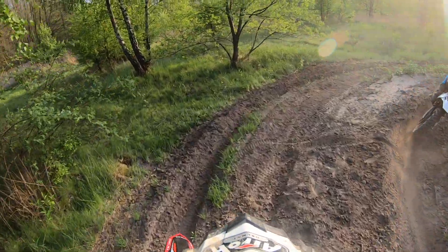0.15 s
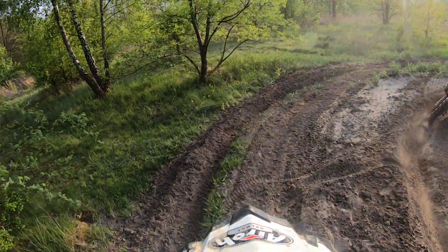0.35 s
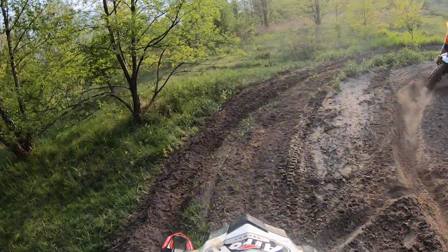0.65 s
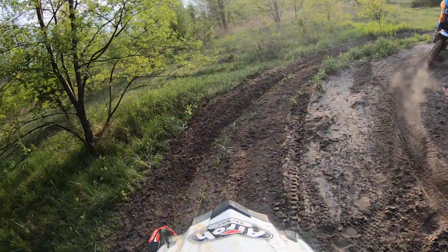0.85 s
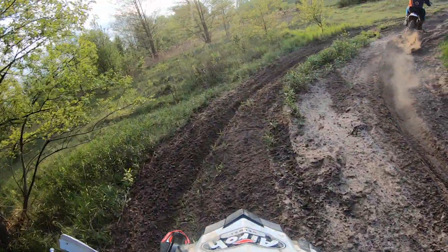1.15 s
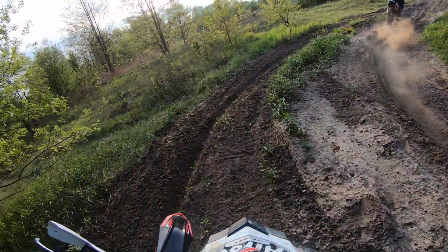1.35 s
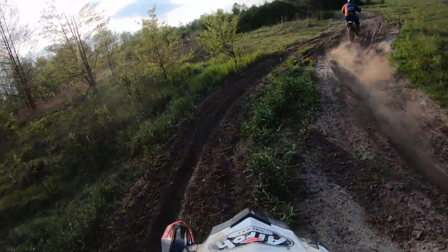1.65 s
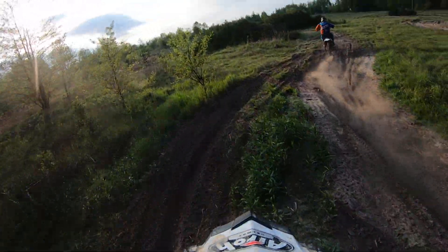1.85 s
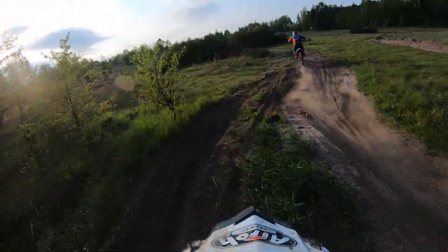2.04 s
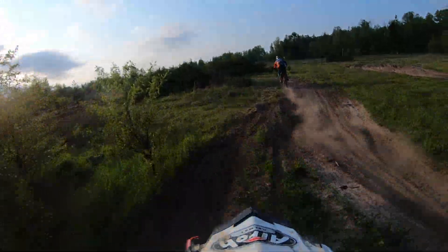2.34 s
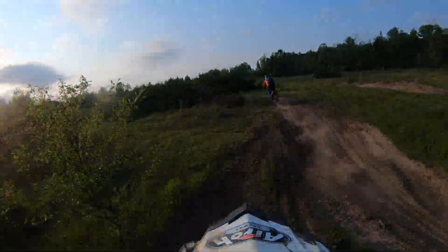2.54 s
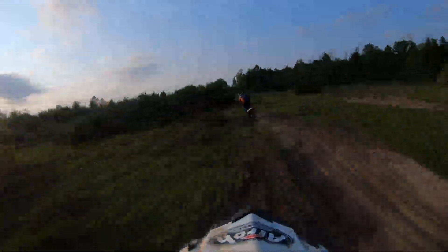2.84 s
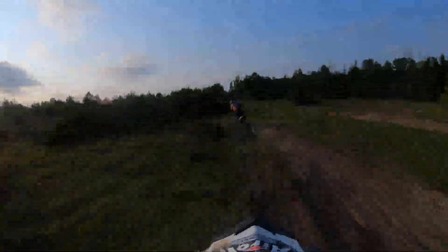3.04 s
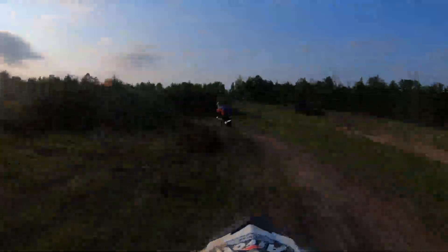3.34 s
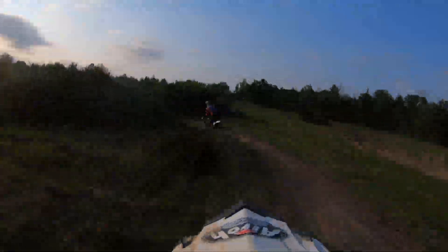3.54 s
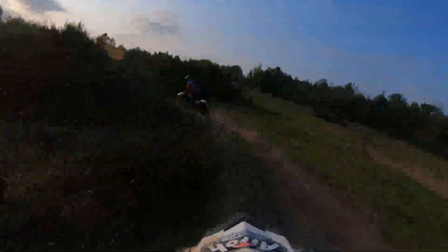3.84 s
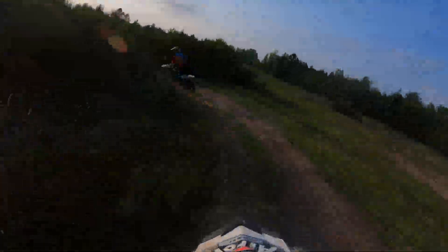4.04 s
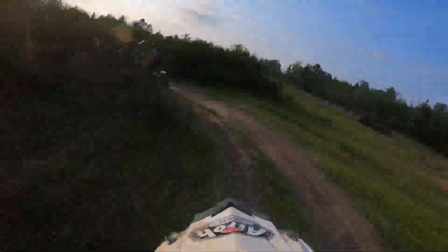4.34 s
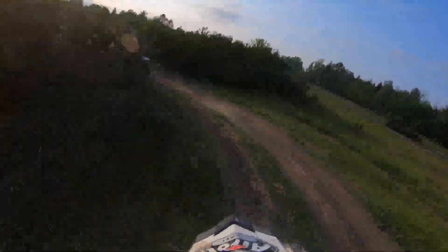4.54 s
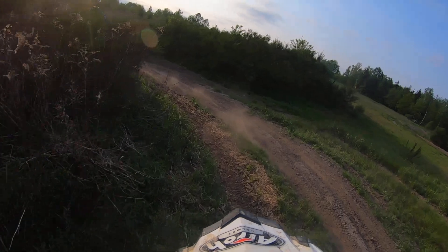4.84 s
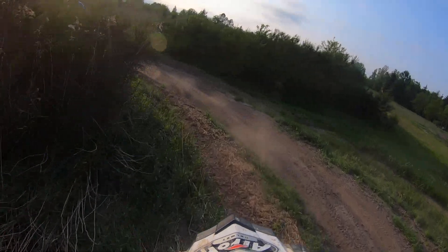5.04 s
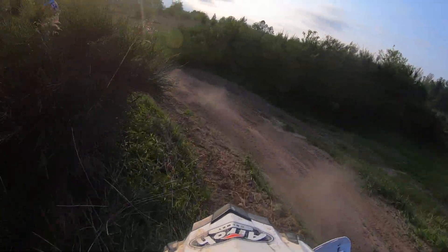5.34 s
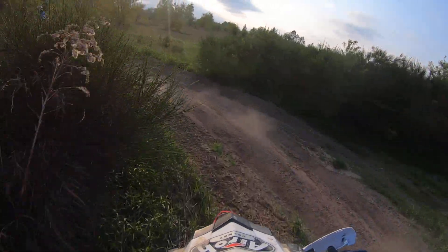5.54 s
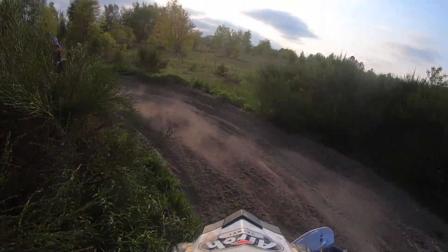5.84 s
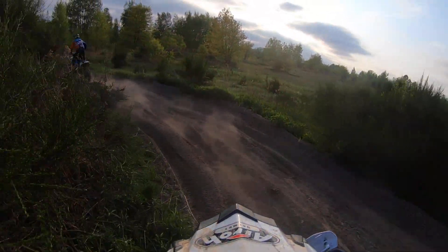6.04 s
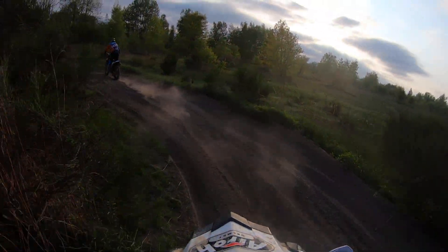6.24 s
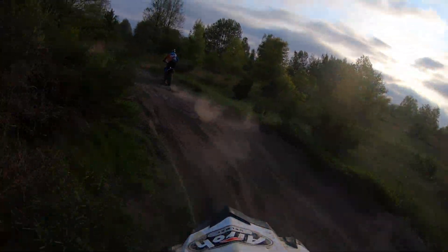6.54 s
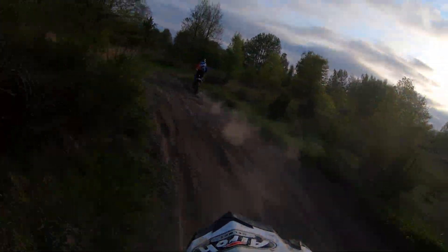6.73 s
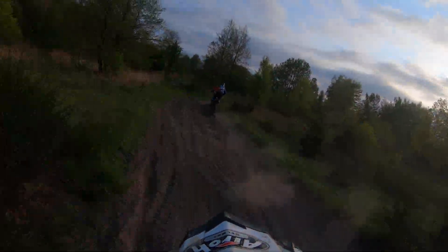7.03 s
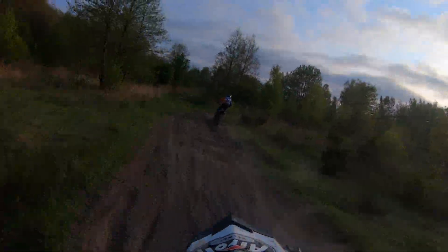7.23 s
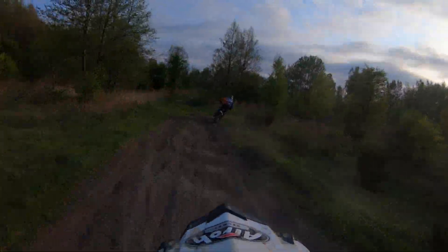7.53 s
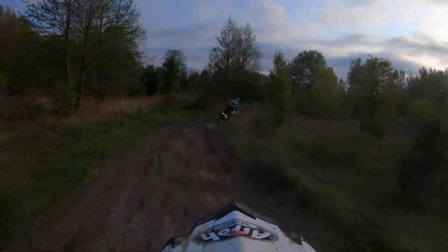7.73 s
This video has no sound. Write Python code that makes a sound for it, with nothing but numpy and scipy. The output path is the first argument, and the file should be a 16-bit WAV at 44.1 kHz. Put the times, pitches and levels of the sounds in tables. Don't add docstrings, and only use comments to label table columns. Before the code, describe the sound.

Heard from the rider's helmet, a dirt bike engine surges, shuts off, rattles through a shower of knocks, then pulls hard again.

```python
import sys
import numpy as np
from scipy import signal
from scipy.io import wavfile
from scipy.ndimage import uniform_filter1d

SR = 44100
rng = np.random.default_rng(int(sys.argv[2]) if len(sys.argv) > 2 else 0)


def file_out(sig):
    cols = np.atleast_2d(sig).T
    lim = np.clip(cols, -1, 1)
    pcm = np.round(lim * 32767).astype(np.int16)
    wavfile.write(sys.argv[1], SR, pcm)


def volts(x):
    e = np.asarray(x, float) / 20
    return 10 ** e


N = 347508


def rms_one(x):
    return x / np.sqrt(np.mean(x ** 2) + 1e-20)


def evened(x, window_s):
    return x / np.sqrt(uniform_filter1d(x ** 2, int(window_s * SR)) + 1e-12)


def in_time(rows):
    s, *columns = np.transpose(rows)
    return [np.interp(np.arange(N) / SR, s, c) for c in columns]


def held(rows, rise_db_per_s, fall_db_per_s):
    t = np.arange(N) / SR
    levels = []
    for start, end, first_db, last_db in rows:
        hold = np.interp(t, [start, end], [first_db, last_db])
        before = rise_db_per_s * np.maximum(start - t, 0)
        after = fall_db_per_s * np.maximum(t - end, 0)
        levels.append(hold - before - after)
    return np.array(levels)


def loudest(rows, rise_db_per_s, fall_db_per_s):
    return held(rows, rise_db_per_s, fall_db_per_s).max(axis=0)


def drift(rate_hz):
    r = np.exp(-80 * np.pi * rate_hz / SR)
    white = rng.standard_normal(N // 40 + 2002)
    slow = signal.lfilter([1], [1, -2 * r, r * r], white)[2000:]
    return np.interp(np.arange(N) / 40, np.arange(len(slow)), rms_one(slow - slow.mean()))


def resonate(x, hz, width_hz):
    r = np.exp(-np.pi * width_hz / SR)
    zeros = np.array([1, 0, -1]) * (1 - r * r) / 2
    return signal.lfilter(zeros, [1, -2 * r * np.cos(2 * np.pi * hz / SR), r * r], x)


def body(x, modes):
    return sum((-1) ** k * volts(db) * resonate(x, hz, width) for k, (hz, width, db) in enumerate(modes))


def band(x, low_hz, high_hz, order=2):
    return signal.sosfilt(signal.butter(order, [low_hz, high_hz], "band", fs=SR, output="sos"), x)


def decay(clicks, s):
    return signal.lfilter([1], [1, -np.exp(-1 / (s * SR))], clicks + 1e-18)


def puff(clicks, swell_s, die_s):
    return rng.standard_normal(N) * decay(decay(clicks, swell_s), die_s) / (swell_s * SR)


def struck(events):
    clicks = np.zeros(N)
    for s, peak_db in events:
        clicks[round(s * SR)] = volts(peak_db)
    return clicks


def coloured_noise(spectrum, patchy_db, rate_hz):
    hz, level_db = np.transpose(spectrum)
    edges = hz[0] * 2 ** np.arange(0, np.log2(hz[-1] / hz[0]), 1 / 3)
    white = rng.standard_normal((2, N))
    together = drift(rate_hz)
    flicker = [volts(patchy_db * (together + 0.32 * drift(rate_hz))) for _ in range(3)]
    out = 0
    for k, (low, high) in enumerate(zip(edges, edges[1:])):
        centre_db = np.interp(np.log(low * high) / 2, np.log(hz), level_db)
        out = out + volts(centre_db) * flicker[k % 3] * band(white[k % 2], low, high)
    return rms_one(out)


def firings(count, rough, jitter, spread_db):
    at = np.flatnonzero(np.diff(np.floor(count))) + 1
    luck = rng.standard_normal((600, 2))[:len(at)]
    period = 1 / np.gradient(count)[at]
    where = np.clip(at + jitter * rough[at] * period * luck[:, 0], 0, N - 1).astype(int)
    clicks = np.zeros(N)
    clicks[where] = volts(spread_db * rough[at] * luck[:, 1])
    return clicks


def own_engine():
    per_s = revs()
    boom_db, rough, pipe_hz, shoulder_db, lower_db, upper_db = throttle(per_s)
    load_db = boom_db + 10
    count = np.cumsum(per_s) / SR
    clicks = firings(count, rough, jitter=.09, spread_db=4.5)
    gas = rms_one(rng.standard_normal(N) * decay(clicks, .012))
    drive = rms_one(clicks) + (.08 + 1.2 * rough) * gas
    ragged = np.clip(1.5 * rough, 0, 1)
    steady = np.sqrt(1 - ragged ** 2)

    wobbly_count = count + 0.042 * rough * drift(27.0)
    clean_boom = tuned_orders(wobbly_count, per_s, pipe_hz, shoulder_db)
    boom = evened(steady * clean_boom + ragged * airbox(drive), 0.052)
    throb = crankcase(drive, count, per_s, ragged, steady)
    lower = lower_pipe(drive, count, per_s, ragged, steady)
    upper = upper_pipe(drive, gas, count, per_s, ragged, steady)

    pipes_follow, flutter_db = 0.37, 1.5
    lower_db = lower_db + pipes_follow * load_db + flutter_db * drift(6.9)
    upper_db = upper_db + 4.0 + pipes_follow * load_db + flutter_db * drift(7.9)
    throb_db = -25 + 0.045 * load_db + 0.41 * (per_s - 45)
    pipes = volts(lower_db) * lower + volts(upper_db) * upper + whistle(drive, gas)
    return volts(boom_db) * boom + volts(throb_db) * throb + pipes


# (t/s, firing rate/Hz)
WHEEL_PACE = [(0, 38.2), (1.6, 41.23), (2.25, 48.88), (2.4, 54), (2.66, 54.66), (2.8, 52.33), (3.07, 51.72),
              (3.5, 53.94), (3.73, 39.36), (4.7, 29.08), (5.39, 33), (5.5, 37.82), (6.3, 38.47),
              (6.5, 43.2), (6.8, 47.2), (7.06, 38.85), (7.4, 40.26), (7.88, 49.47)]
# (start t/s, end t/s, extra firing rate/Hz)
WHEELSPIN = [(0.361, 0.661, 10), (.878, 1.46, 26), (1.35, 1.52, 25), (1.855, 2.225, 22.5),
             (2.405, 2.67, 18.5), (2.656, 2.778, 6.06), (2.8, 2.91, 7), (3.091, 3.21, 4.81),
             (3.212, 3.378, 10.3), (3.385, 3.51, 14), (5.572, 5.689, 3.955), (6.317, 6.464, 3.993),
             (7.17, 7.35, 2.5), (7.42, 7.72, 5), (7.76, 7.95, 2)]


def revs():
    up_hz_per_s, down_hz_per_s = 130, 100
    t = np.arange(N) / SR
    per_s, = in_time(WHEEL_PACE)
    for start, end, extra in WHEELSPIN:
        ramp = np.minimum(up_hz_per_s * (t - start), down_hz_per_s * (end - t))
        per_s = per_s + extra * np.tanh(1.7 * np.maximum(ramp, 0) / extra)
    return uniform_filter1d(per_s, int(0.036 * SR))


# (opens t/s, shuts t/s, boom level/dB at opening, at shutting)
THROTTLE_OPENINGS = [(.43, .62, -10.5, -6.5), (.66, .86, -9.5, -11.5), (.9, .96, -11, -8),
                     (.99, 1.28, -6, -5.5), (1.33, 1.42, -9.5, -9), (1.47, 1.7, -13.5, -13.5),
                     (1.74, 1.9, -16, -16), (1.97, 2.17, -6, -7.5), (2.27, 2.5, -8, -2.5),
                     (2.5, 2.61, -1.5, -3), (2.66, 2.78, -5.5, -5.5), (2.83, 3.16, -5, -5),
                     (3.24, 3.47, -5, -6), (4.8, 5.08, -19, -28.5), (5.41, 5.52, -13.5, -13),
                     (5.6, 5.73, -5.5, -10), (5.83, 5.95, -14, -20.5), (6.07, 6.19, -10.5, -15.5),
                     (6.23, 6.66, -9, -4.5), (6.72, 6.98, -8.5, -7), (7.0, 7.18, -8.5, -7),
                     (7.2, 7.44, -9, -8), (7.5, 7.88, -2.5, -11.5)]
OPEN_ROUGHNESS = [.25, .45, .08, .04, .06, .45, .6, .05, .1, .03, .2, .08, .18, .8, .3, .13, .7, .45, .09,
                  .06, .1, .16, .14]
# (tuned-pipe f/Hz, shoulder level/dB, lower pipe level/dB, upper pipe level/dB)
OPENING_VOICES = [(242.4, -3.5, -24.5, -26.5), (260, 3, -21.5, -25.5), (247, -2, -11, -23),
                  (252, -13, -16, -27), (239, -25, -9, -27), (268, 7, -14, -25.5), (270, 6, -17.5, -34),
                  (250.4, -7.5, -16, -30), (259.3, -11.5, -23.5, -30), (273, -30, -23.5, -34.5),
                  (251.4, -15, -18, -32.5), (243, 0, -18.5, -33.5), (249.1, -5, -19.5, -30),
                  (262, -6, -33, -28.5), (251, -9, -29, -29), (262, -12, -46, -27), (262, -7, -42, -33),
                  (272.3, -15, -42, -25), (264.3, -13, -43.5, -23.5), (268.1, -4, -35.5, -32.5),
                  (263.7, -13.5, -37, -34), (246, -6, -31, -28.5), (244, -8.5, -24.5, -26),
                  (243, -2.5, -46, -45)]


def throttle(per_s):
    open_db_per_s, shut_db_per_s, shut_roughness = 194.5, 205.5, .8
    opened_db = held(THROTTLE_OPENINGS, open_db_per_s, shut_db_per_s)
    coast_db = -32.5 + 0.9586 * np.clip(per_s - 35, -20, 20)
    levels = np.vstack([opened_db, coast_db])
    settings = np.vstack([np.append(OPEN_ROUGHNESS, shut_roughness), np.transpose(OPENING_VOICES)])
    current = settings[:, levels.argmax(axis=0)]
    return levels.max(axis=0), *uniform_filter1d(current, SR // 12)


# (start t/s, end t/s, start level/dB, end level/dB)
LOW_SHOULDER_OPEN = [(1.12, 1.28, -13, -13.5), (2.42, 2.62, -12, -10), (2.92, 3.05, -9, -14),
                     (3.22, 3.42, -5.5, -7), (7.5, 7.66, -13.5, -7.5)]


def tuned_orders(count, per_s, pipe_hz, shoulder_db):
    low = volts(np.maximum(-22.5, loudest(LOW_SHOULDER_OPEN, 150, 150)))
    high = volts(shoulder_db)
    out = 0
    for k in range(3, 10):
        hz = k * per_s
        off = (hz - pipe_hz) / 25.4
        shoulders = high / (1 + ((hz - 311.4) / 19) ** 2) + low / (1 + ((hz - 205) / 22) ** 2)
        main = (1 + off ** 2) ** -np.where(off < 0, 1.3, .9)
        wave = np.sin(2 * np.pi * k * count - np.arctan(off) + 0.66 * drift(8.4))
        out = out + wave * volts(1.5 * drift(9.)) * (shoulders + main)
    return evened(band(out, 167, 324.0), 0.067)


# (f/Hz, width/Hz, level/dB)
AIRBOX_MODES = [(253.6, 34, 3), (336, 35, -2), (213, 66, -5)]


def airbox(drive):
    return evened(band(body(drive, AIRBOX_MODES), 184, 350), 0.047)


def overtones(count, per_s, low_hz, high_hz, order):
    out = 0
    for k in order:
        edge_hz = np.minimum(k * per_s - low_hz, high_hz - k * per_s)
        inside = np.clip(edge_hz / 30, 0, 1)
        phase = 2 * np.pi * k * count + .02 * k * k + .3 * drift(6.)
        out = out + inside * np.sin(phase) * volts(1.5 * drift(6.))
    return out


# (f/Hz, width/Hz, level/dB)
CRANKCASE_MODES = [(91, 41, 0.5), (117, 46, 0.5), (174.5, 23, 1)]


def crankcase(drive, count, per_s, ragged, steady):
    throb = evened(band(body(drive, CRANKCASE_MODES), 79, 210), 0.025)
    low_orders = overtones(count, per_s, 59, 225, order=range(2, 5))
    return ragged * throb + steady * (.5 * throb + volts(-5) * low_orders)


# (f/Hz, width/Hz, level/dB)
LOWER_PIPE_MODES = [(440, 61, -6), (495, 97, -5)]


def lower_pipe(drive, count, per_s, ragged, steady):
    rung = evened(band(body(drive, LOWER_PIPE_MODES), 345, 488), 0.3)
    clean = evened(overtones(count, per_s, 323, 510, order=range(5, 14)), 0.2)
    return steady * clean + ragged * rung


# (f/Hz, width/Hz, level/dB)
UPPER_PIPE_MODES = [(547, 184, 3.5), (667, 130, 1)]


def upper_pipe(drive, gas, count, per_s, ragged, steady):
    rung = evened(band(body(drive + 0.27 * gas, UPPER_PIPE_MODES), 240, 900), 0.3)
    lugging = per_s < 52
    wobbly_count = count + .011 * lugging * drift(15.)
    low_hz = np.clip(11.5 * per_s, 430, 500)
    high_hz = np.clip(15 * per_s, 580, 710)
    clean = evened(overtones(wobbly_count, per_s, low_hz, high_hz, order=range(8, 18)), .09)
    return .8 * steady * clean + (.35 + .65 * ragged) * rung


# (start t/s, end t/s, start level/dB, end level/dB)
SILENCER_WHISTLE = [(2.7, 3.47, -28.5, -29)]


def whistle(drive, gas):
    ring = resonate(resonate(drive + gas, 855, 90), 855, 90)
    return volts(loudest(SILENCER_WHISTLE, 300, 250)) * evened(ring, 0.094)


# (t/s, count)
LEADER_FIRINGS = [(.008, 0), (.168, 4), (.3397, 9), (.423, 11), (.7004, 18), (.816, 21), (.9274, 24),
                  (1.025, 27), (1.11, 30), (1.2282, 34), (1.359, 38), (1.4507, 41), (1.5125, 43),
                  (1.5949, 46), (2.0, 62), (5.103, 170), (5.259, 175), (5.321, 177), (5.822, 192),
                  (5.8838, 194), (5.996, 198), (6.0474, 200), (6.0948, 202), (6.35, 212), (7.88, 280)]
# (t/s, level/dB)
LEADER_THUMP = [(0, -14.5), (.42, -12.5), (.95, -11), (1.12, -21.5), (1.45, -14), (2.1, -39.5),
                (4.9, -27.5), (5.1, -28), (5.35, -22.5), (5.7, -24), (5.9, -28), (6.3, -24.5), (6.6, -40),
                (7.88, -49)]
# (start t/s, end t/s, start level/dB, end level/dB)
LEADER_BARKS = [(.42, .62, -29.5, -35), (.69, 1.12, -31.5, -36.5), (1.2, 1.37, -41.5, -43),
                (1.44, 1.63, -39.5, -34.5), (5.12, 5.33, -40, -41.5), (5.85, 6.1, -40, -35.5)]
# (t/s, level/dB)
CRACK_TREBLE = [(0, 0.5), (1.2, -3), (5, -1), (7.88, -5)]


def leader():
    count, = in_time(LEADER_FIRINGS)
    clicks = firings(count + 1e-3, np.ones(N), jitter=.01, spread_db=1.)
    clicks[round(LEADER_FIRINGS[0][0] * SR)] = 1
    thump = resonate(resonate(clicks, 147.5, 72), 141.7, 70)

    blast = puff(clicks, .0007, .0025) + .06 * puff(clicks, .002, .012) + 3 * clicks
    treble = volts(-11) * band(blast, 2500, 3200, order=3)
    treble += volts(-16) * band(blast, 3200, 5400, order=4)
    treble += volts(-30) * band(blast, 5400, 8000, order=4)
    treble += volts(-36) * band(blast, 9500, 14000)
    treble_db, = in_time(CRACK_TREBLE)
    crack = band(blast, 800, 1700, order=3) + volts(-6) * band(blast, 1700, 2500, order=3)
    crack = crack + volts(treble_db) * treble

    thump_db, = in_time(LEADER_THUMP)
    crack_db = np.maximum(-46 + .5 * (thump_db + 15), loudest(LEADER_BARKS, 150, 150))
    return volts(thump_db) * evened(thump, .15) + volts(crack_db + 5) * evened(crack, .2)


# (t/s, peak level/dB)
NEAR_KNOCKS = [(3.563, -27), (3.929, -11), (4.407, -25), (4.551, -23), (4.857, -30), (4.942, -14),
               (5.062, -1), (5.167, -7)]
# (t/s, peak level/dB)
FAR_SIDE_KNOCKS = [(4.836, -5), (5.006, -2), (5.157, -4)]


def knocks():
    clicks = struck(NEAR_KNOCKS) - struck(FAR_SIDE_KNOCKS)
    soft = decay(decay(clicks, .0005), .0005) / (.0005 * SR) ** 2
    dirt = band(rng.standard_normal(N) * decay(clicks, 0.0054), 300, 1500)
    return volts(46.0) * resonate(soft, 150, 91.5) + volts(-31) * dirt


# (t/s, peak level/dB)
VISOR_TICKS = [(3.68, -40), (3.7848, -44), (3.7994, -47), (3.8312, -39), (3.8885, -45), (3.925, -41.5),
               (3.955, -42), (4.0168, -41), (4.035, -38), (4.1255, -40), (4.1614, -39), (4.225, -37),
               (4.2958, -37.5), (4.366, -37.5), (4.4742, -38), (4.715, -30), (5.4194, -26), (5.4636, -26),
               (5.5096, -24.5), (5.854, -29)]
# (t/s, peak level/dB)
EARTH_LUMPS = [(4.718, -21), (4.764, -10), (4.791, -13), (4.83, -4.5), (4.854, -10), (4.881, -8),
               (4.924, -9), (4.942, -13), (4.986, -13), (5.039, -15), (5.074, -20), (5.364, -17),
               (6.884, -17), (7.48, -18)]


def pebbles():
    ticks = band(puff(struck(VISOR_TICKS), .001, .003), 2000, 8000, order=3)
    burst = puff(struck(EARTH_LUMPS), .0015, .006)
    dull_burst = volts(7.5) * band(burst, 300, 1200) + volts(-6.5) * band(burst, 1300, 2350, order=3)
    return volts(-0.5) * ticks + dull_burst


# (t/s, peak level/dB)
HOLLOW_POPS = [(3.233, -18), (5.160, -17), (5.444, -20), (5.550, -20), (5.627, -21), (6.111, -13),
               (6.157, -14), (6.338, -19), (6.364, -19), (6.410, -19), (6.455, -19), (6.503, -18),
               (6.612, -19), (6.634, -18), (7.481, -20), (7.647, -19)]


def pops():
    ring = resonate(resonate(struck(HOLLOW_POPS), 670, 220), 670, 220)
    return ring * SR / 500


# (t/s, peak level/dB)
CHAIN_SLAPS = [(0.0412, -14.5), (.421, -13), (3.8478, -30), (4.0575, -23.5), (4.0886, -23), (4.1063, -23),
               (4.2486, -25), (4.345, -29), (4.4454, -25), (4.5055, -23), (4.548, -26), (4.6637, -22),
               (4.9813, -16), (5.1667, -17), (5.3648, -27), (5.44, -13.5), (5.4922, -14), (5.5698, -16),
               (5.598, -19), (5.6294, -17), (5.818, -19), (5.919, -15), (5.9579, -26), (5.984, -16),
               (6.0162, -20), (6.0487, -22), (6.0994, -22), (6.1524, -44), (6.2022, -39), (6.2567, -34)]


def slaps():
    rattle = puff(struck(CHAIN_SLAPS), .002, .004)
    return volts(-1.5) * band(rattle, 1500, 4500, order=4) + volts(-11) * band(rattle, 4500, 7500, order=4)


# (start t/s, end t/s, start level/dB, end level/dB)
EARTH_SPRAY = [(4.76, 4.8, -40, -32), (4.83, 4.88, -22, -36), (4.92, 5.0, -23, -25.5),
               (5.045, 5.07, -34, -36), (5.31, 5.39, -33, -31)]


def spray():
    sizes = volts(4 * np.minimum(rng.exponential(1, N), 2.2)) * rng.choice([-1, 1], N)
    grains_per_s = 1800 * volts(5 * drift(40))
    grains = sizes * (rng.random(N) < grains_per_s / SR)
    ticks = band(grains, 350, 810) + volts(-8.5) * band(grains, 1123, 2130, order=3)
    ticks = signal.sosfilt(signal.butter(2, 2600, fs=SR, output="sos"), ticks)
    return volts(loudest(EARTH_SPRAY, 205, 353)) * rms_one(ticks)


# (start t/s, end t/s, start level/dB, end level/dB)
DRY_GRASS = [(4.7, 5.38, -53.5, -44)]


def grass():
    hiss = band(rng.standard_normal(N), 4200, 6900, order=3) * volts(2.0 * drift(25.))
    return volts(loudest(DRY_GRASS, 40, 60)) * rms_one(hiss)


# (t/s, level/dB)
GROUND_GRIT = [(0, -40), (.28, -42), (.5, -38.5), (1.2, -41.5), (1.55, -42), (1.95, -40), (2.45, -47),
               (3.47, -47.5), (3.62, -54.5), (4.05, -54.5), (4.55, -52.5), (4.75, -45), (5.3, -50),
               (5.55, -37), (5.8, -43), (6.3, -45), (7.1, -47.5), (7.88, -47)]
# (start t/s, end t/s, start level/dB, end level/dB)
DIRT_SHOWERS = [(.5, .93, -27.5, -31.5), (1.5, 1.9, -32.5, -25), (3.1, 3.4, -32, -34),
                (4.82, 4.93, -27, -22), (5.34, 5.4, -29.5, -29), (5.85, 6.3, -34.5, -32),
                (7.05, 7.13, -33, -32.5), (6.87, 6.91, -34.5, -31.5), (7.75, 7.88, -27, -26)]
# (f/Hz, density/dB per Hz)
RUSH_SPECTRUM = [(410, 0.5), (700, 6), (903, -2), (1250, 0), (1350, -3), (2350, -19.5), (2830, -15),
                 (5000, -42.5), (6500, -53.5), (11000, -120)]
# (f/Hz, density/dB per Hz)
GRIT_SPECTRUM = [(1060, -40.5), (1800, -6.5), (2460, -13), (2810, -9), (4210, -17), (5400, -18),
                 (7100, -25.5), (8280, -35.5), (10800, -34.5), (18200, -120)]


def rush_and_grit():
    grit_db, = in_time(GROUND_GRIT)
    rush_db = np.maximum(-35.5 + 0.42 * (grit_db + 45), loudest(DIRT_SHOWERS, 92, 92))
    rush = volts(rush_db + 5.5) * coloured_noise(RUSH_SPECTRUM, patchy_db=2.5, rate_hz=48)
    grit = volts(grit_db + 3.5) * coloured_noise(GRIT_SPECTRUM, patchy_db=1.47, rate_hz=12)
    return rush + grit


# (start t/s, end t/s, start level/dB, end level/dB)
WIND_GUSTS = [(0, .08, -16, -25.5), (.37, .42, -34, -28), (.62, .97, -23.5, -17), (1.48, 1.9, -20.5, -23),
              (3.12, 3.62, -25.5, -22.5), (3.89, 3.97, -22.5, -26.5), (4.38, 4.42, -45, -25),
              (4.53, 4.6, -24, -24), (4.82, 4.96, -18.5, -20), (5.17, 5.19, -21.5, -25),
              (5.35, 5.52, -26, -24), (5.8, 6.62, -20.5, -20), (7.2, 7.57, -17, -22),
              (7.66, 7.76, -16, -18)]
# (f/Hz, density/dB per Hz)
WIND_SPECTRUM = [(12, -54.5), (20, -10), (54, -6.5), (88, -3.5), (112, -17), (130, -6.5), (273, -17),
                 (500, -17.5), (650, -74), (1100, -120)]


def wind():
    wind_db = np.maximum(-29.5, loudest(WIND_GUSTS, 70, 70))
    return volts(wind_db + 5.5) * coloured_noise(WIND_SPECTRUM, patchy_db=1.5, rate_hz=53)


def scene():
    bikes = own_engine() + leader()
    hits = knocks() + pebbles() + pops() + slaps() + spray()
    return (bikes + hits + grass() + rush_and_grit() + wind())[None]


def top_cut(x):
    return signal.sosfilt(signal.butter(12, 15140, fs=SR, output="sos"), x)


def record(dry):
    limited = 0.85 * np.tanh(dry / 1.465)
    dull = signal.sosfilt(signal.butter(3, 10500, fs=SR, output="sos"), limited)
    return top_cut(dull)


dry = scene()
out = record(dry)
file_out(out)
```